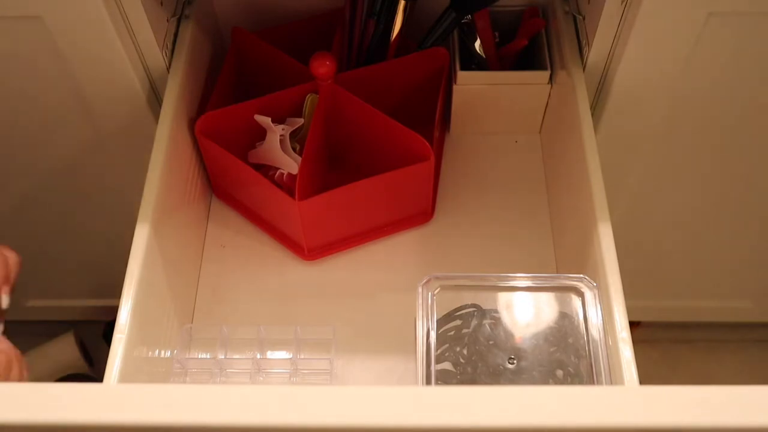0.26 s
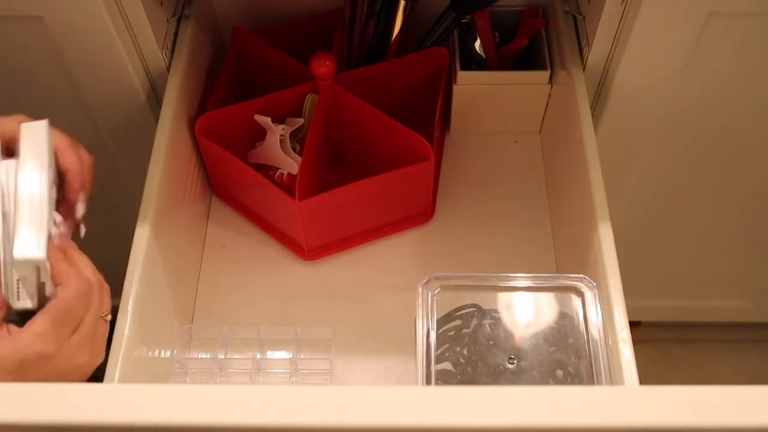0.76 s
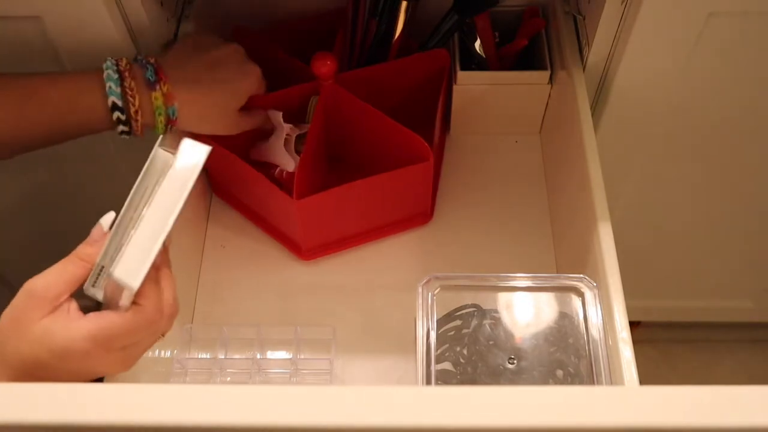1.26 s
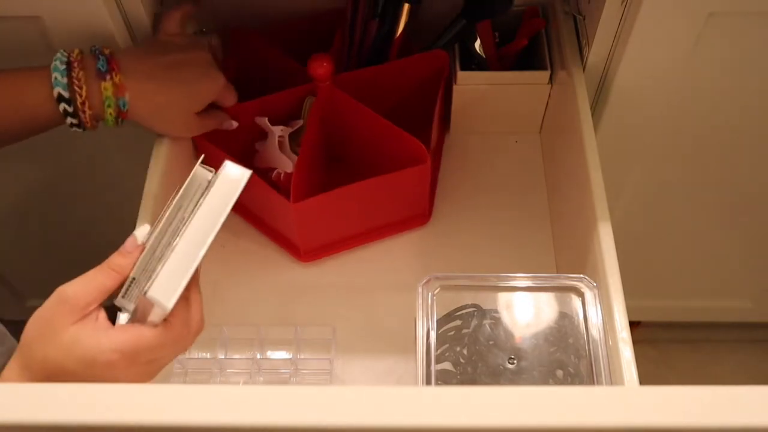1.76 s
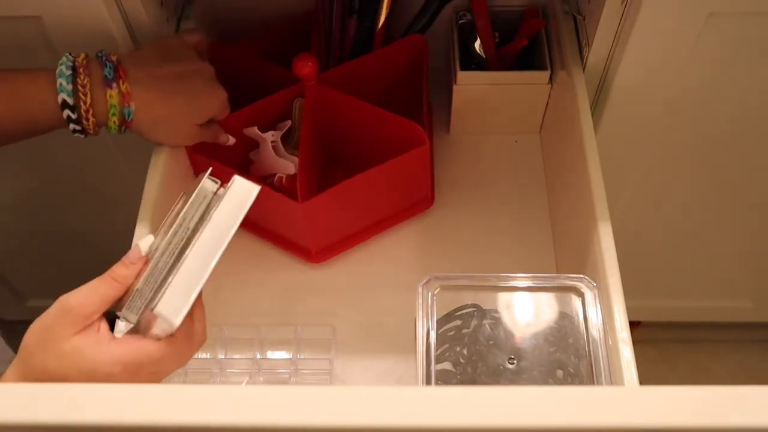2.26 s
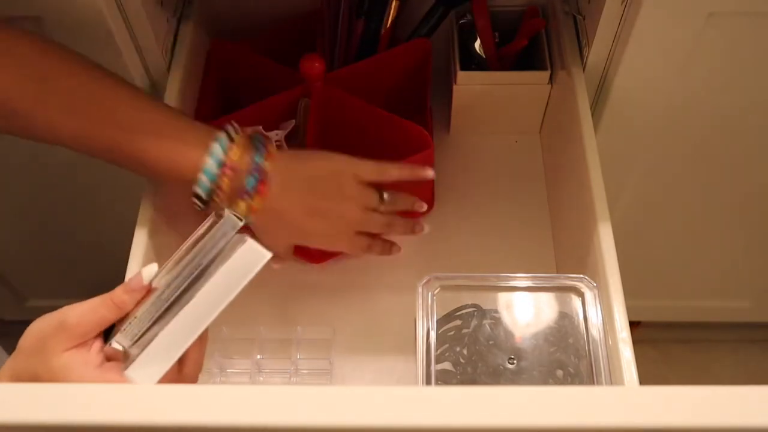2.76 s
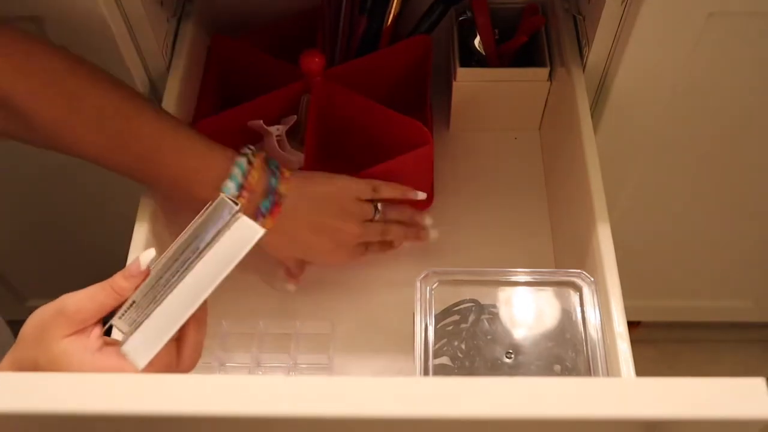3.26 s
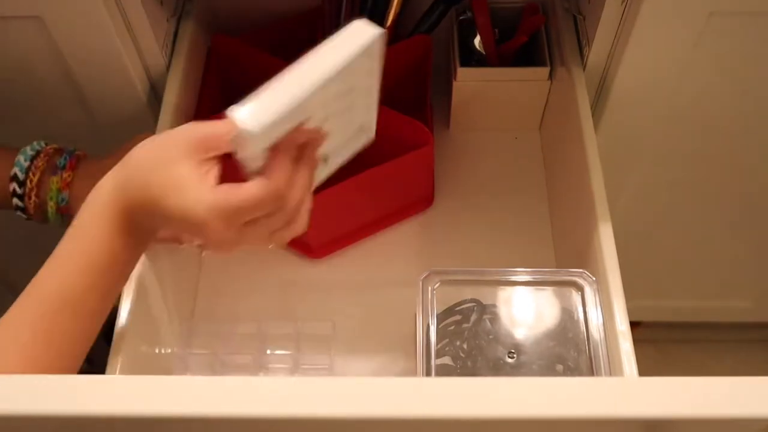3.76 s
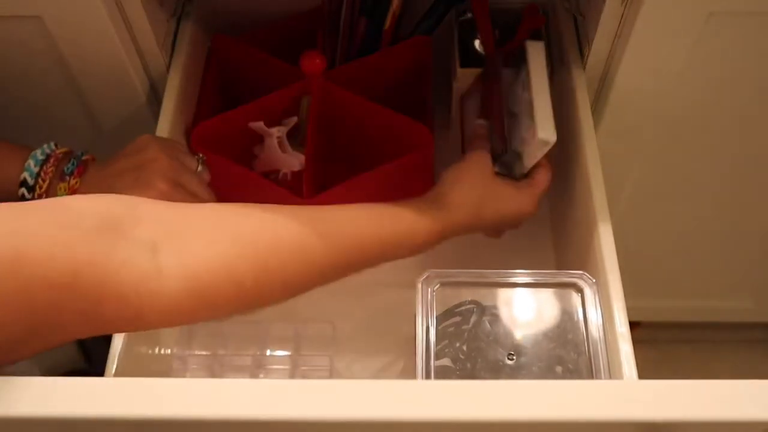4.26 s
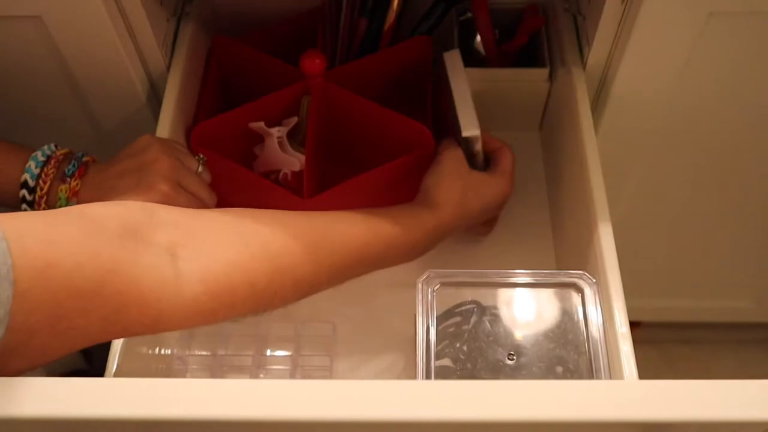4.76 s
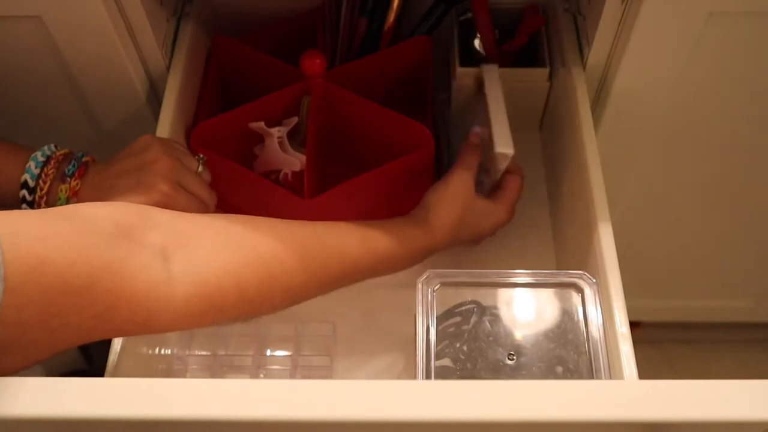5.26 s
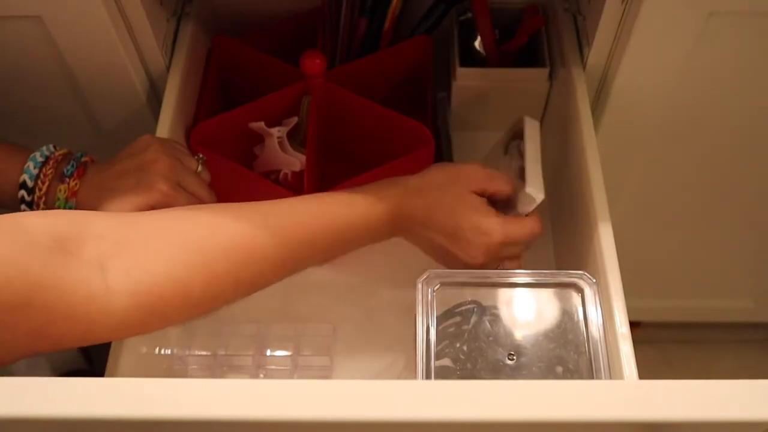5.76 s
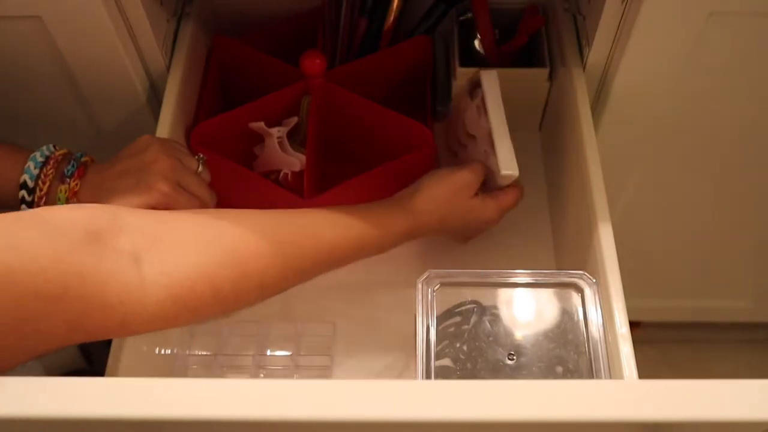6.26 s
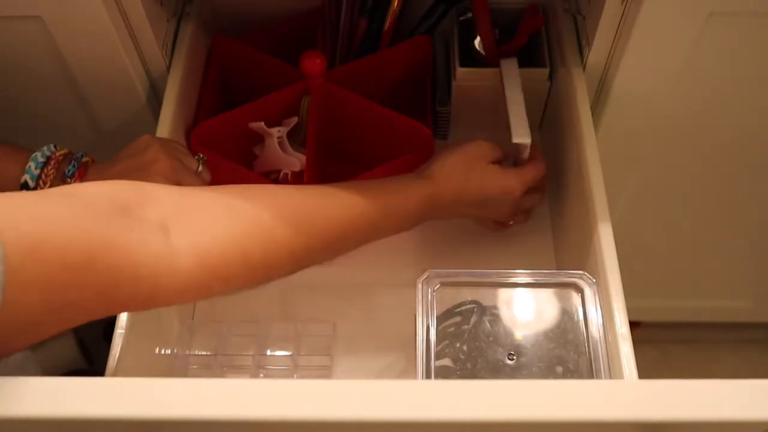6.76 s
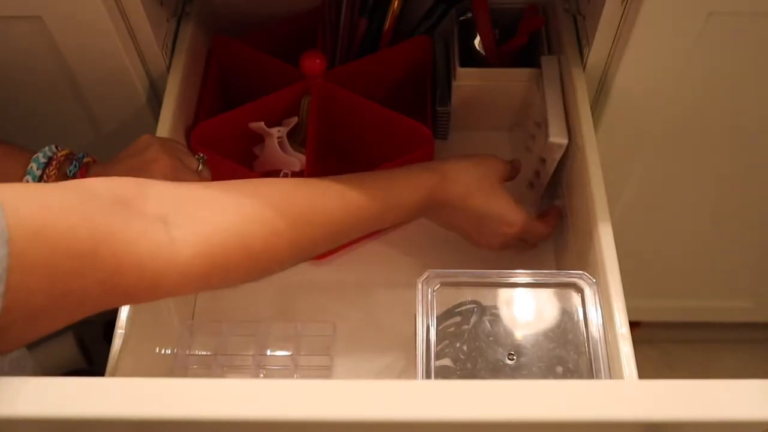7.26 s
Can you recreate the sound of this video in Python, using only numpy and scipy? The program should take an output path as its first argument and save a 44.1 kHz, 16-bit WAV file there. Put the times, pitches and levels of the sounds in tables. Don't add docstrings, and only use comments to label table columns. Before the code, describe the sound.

Close dry plastic clacks, short scuffs and woody bumps as small items are shifted in a drawer in a small room with faint ventilation noise.

```python
import sys
import numpy as np
from scipy import signal
from scipy.fft import rfft, irfft, next_fast_len
from scipy.io import wavfile
from scipy.ndimage import map_coordinates

SR = 44100
rng = np.random.default_rng(int(sys.argv[2]) if len(sys.argv) > 2 else 0)


def amplitude_ratio(level_db):
    exponent = np.asarray(level_db, float) / 20
    return 10 ** exponent


def master_out(mix):
    frames = np.transpose(np.atleast_2d(mix))
    ceiling = np.clip(frames, -1, 1)
    pcm = np.round(ceiling * 32767).astype(np.int16)
    wavfile.write(sys.argv[1], SR, pcm)


N = 330818
LEAD = 0.002


def unit(x):
    return x / np.sqrt(np.mean(x ** 2) + 1e-20)


def along(points, hz):
    f, value = np.transpose(points)
    return np.interp(np.log(hz + 1), np.log(f + 1), value)


def filtered(x, response):
    m = next_fast_len(len(x) + SR // 4)
    spectrum = rfft(x, m) * response(np.fft.rfftfreq(m, 1 / SR))
    return irfft(spectrum, m)[:len(x)]


def modes(table):
    def response(f):
        total = 0
        for k, (centre, width, db) in enumerate(table):
            damping = 1j * f * width
            total = total + (-1) ** k * amplitude_ratio(db) * damping / (centre * centre - f * f + damping)
        return total
    return response


def wobble(rate):
    knots = rng.standard_normal(int(N * rate / SR) + 4)
    return map_coordinates(knots, [np.arange(N) * rate / SR])


# (frequency [Hz], spectral level [dB per Hz])
AIR_SPECTRUM = [(12, -40), (20, -28), (44, -13), (156, -12.5), (314, -10), (393, -10), (620, -3.5),
                (863, 1.5), (1080, 2), (1600, -3.5), (2660, -8.5), (6710, -13.5), (11000, -19),
                (15500, -22.5)]


def hiss():
    noise = filtered(rng.standard_normal(N), lambda f: amplitude_ratio(along(AIR_SPECTRUM, f)))
    return amplitude_ratio(-41.5 + 0.16 * wobble(2.9)) * unit(noise)


# (frequency [Hz], width [Hz], level [dB])
BOARD_MODES = [(216, 37, -4.5), (273.4, 60, -2), (304.7, 29, 4.5), (364, 70, -9.5)]


def boards():
    return modes(BOARD_MODES)


# (frequency [Hz], width [Hz], level [dB])
PANEL_MODES = [(495, 45, -1), (582, 138, -4), (662, 99, -3), (755, 73, 4), (823, 140, 0.5),
               (951, 103, -2.5), (1200, 650, -17.5), (1760, 230, -15.5)]


def panels(*objects):
    return modes(PANEL_MODES + list(objects))


def strokes(table):
    rise, sag, fall = 315, 4.5, 164
    t = np.arange(0, N + 64, 64) / SR
    s, length, *levels_db = np.transpose(table)[..., None]
    before = np.maximum(s - t, 0)
    during = np.clip(t - s, 0, length)
    after = np.maximum(t - s - length, 0)
    shape_db = -rise * before - sag * during - fall * after
    gains = [np.linalg.norm(amplitude_ratio(db + shape_db), axis=0) for db in levels_db]
    return [np.interp(np.arange(N) / SR, t, gain) for gain in gains]


def grit(depth_db):
    grain_db = depth_db * wobble(70) + depth_db * wobble(400)
    return rng.standard_normal(N) * amplitude_ratio(grain_db)


# (frequency [Hz], spectral level [dB per Hz])
SCUFF_SPECTRUM = [(470, -44), (800, -34), (957, 10.5), (1040, 0), (1130, -1.5), (1580, -1.5), (2350, -4),
                  (3330, -5), (6910, -10), (14000, -29.5)]
# (time [s], length [s], board rumble level [dB], scuff level [dB])
SLIDES = [(0, 0.051, -48, -36), (0.097, 0.65, -46.5, -41.5), (1.115, 0.18, -35, -35.5),
          (1.44, 0.096, -34, -31), (1.603, 0.23, -41, -44), (1.927, .11, -25.5, -28), (2.1, .09, -36, -40),
          (2.336, 0.12, -34, -43), (2.838, 0.089, -26, -30.5), (3.17, 0.092, -44, -43),
          (3.577, .19, -40, -37.5), (3.84, 0.88, -48, -46), (4.91, 0.4, -46, -45), (5.29, 0.077, -47, -45),
          (5.738, .06, -35.5, -44), (5.812, 0.22, -32, -39), (6.068, .2, -45.5, -42),
          (6.47, 0.052, -41, -44), (6.604, 0.11, -45, -40), (6.75, 0.051, -34.5, -32.5),
          (6.874, 0.098, -32.5, -32), (7.106, .04, -45, -40.5), (7.3, 0.18, -45, -55)]


def sliding():
    board, panel = boards(), panels()
    rumble = unit(filtered(grit(0.56), lambda f: amplitude_ratio(-3.5) * board(f) + panel(f)))
    scuff = unit(filtered(grit(1.6), lambda f: amplitude_ratio(along(SCUFF_SPECTRUM, f))))
    on_wood, on_plastic = strokes(SLIDES)
    return amplitude_ratio(-8.5) * on_wood * rumble + amplitude_ratio(-4.5) * on_plastic * scuff


def contact(t60, rise, blow=0):
    t = np.clip(np.arange(SR // 4) / SR - LEAD, 0, None)
    decay = amplitude_ratio(-60 * (t / max(t60, 0.002)) ** 1.89)
    onset = (1 - np.exp(-t / rise)) ** 2
    push = t / 0.0002 * np.exp(-t / 0.00017)
    return rng.standard_normal(len(t)) * decay * onset + blow * push


def silence():
    return np.zeros(N + SR)


def add(track, s, sound, db):
    at = round((s - LEAD) * SR)
    track[at:at + len(sound)] += amplitude_ratio(db) * sound / np.abs(sound).max()


# (frequency [Hz], spectral level [dB per Hz])
CRACK_SPECTRUM = [(590, -26), (1000, -4.5), (1870, -7), (2180, 2), (2940, -7), (3190, -4), (3500, -3),
                  (5380, -5), (7700, -9), (16000, -42)]


def plastic(ring_hz, ring_db, hard_db):
    plate = modes([(ring_hz, 0.1 * ring_hz, ring_db)])
    return lambda f: plate(f) + amplitude_ratio(along(CRACK_SPECTRUM, f) + hard_db * np.log2((f + 500) / 4000))


def tap(track, s, db, ring_hz, ring_db, hard_db, t60):
    force = contact(t60, rise=0.00039)
    add(track, s, filtered(force, plastic(ring_hz, ring_db, hard_db)), db - 0.5)


# (time [s], peak level [dB],
# hardness [dB per octave], chatter t60 [s])
DRY_CLACKS = [(0.0171, -25, -5.5, 0.021), (0.1901, -32, -5, 0.019), (.375, -16, 2.5, 0.01),
              (0.6294, -28, 4, .025), (0.6687, -29, 3, .016), (0.6924, -27, 2, 0.013),
              (0.729, -24, -1.5, 0.018), (1.099, -23, -1, .028), (1.193, -15.5, 0, .019),
              (1.283, -24, -1, 0.044), (1.3083, -26, -6, .022), (1.402, -38, 9, .025),
              (1.426, -5, 3.5, 0.021), (1.5193, -11, 0.3, 0.027), (1.923, -16.5, -17, .032),
              (1.955, -20, -1, .022), (1.9865, -7, -0.3, 0.034), (2.0296, -24, -3, 0.016),
              (2.1499, -22, -2.5, 0.019), (2.4093, -20, -0.5, 0.021), (2.4497, -33, 6, .022),
              (2.4665, -25, -4, 0.035), (2.8164, -25.5, 2.1, 0.029), (2.847, -15, 4, 0.041),
              (3.613, -23, 9, .022), (3.637, -17.5, 4, 0.01), (3.6544, -25, -10, 0.015),
                  (3.684, -30, 9, 0.024), (3.7, -14, 4.5, 0.0063), (3.7268, -15, 1, 0.0078),
                  (3.992, -26.5, 1.5, 0.027), (4.068, -34, 12, 0.011), (4.3734, -25.5, -4.5, 0.039),
                  (4.7643, -28.5, -5, 0.028), (5.0248, -16.5, -0.5, .013), (5.0496, -27, -6, .024),
                  (5.264, -30.5, 4, 0.018), (5.34, -26, 5, .015), (5.345, -23.5, 9, .012),
                  (5.488, -30, -1, .022), (5.829, -23, 1.5, 0.031), (5.8328, -18.5, -1, .01),
                  (5.9459, -22, 1.5, 0.021), (6.4826, -23.5, -1, 0.017), (6.521, -20, 5, 0.02),
                  (6.7454, -29, -6, 0.017), (6.839, -8.5, 10, 0.011), (6.986, -32, 12, .012)]


def clacks():
    track = silence()
    for s, db, hard_db, t60 in DRY_CLACKS:
        tap(track, s, db, 2430, -20.5, hard_db, t60)
    return track[:N]


# (time [s], peak level [dB], ring [Hz], hardness [dB per octave])
LID_TAPS = [(0.25, -27, 2350, 4), (0.5886, -34, 4180, .6), (1.07, -6, 3960, 4), (1.139, -25, 4390, 9),
            (1.226, -18.5, 4440, 4), (1.2395, -22, 4380, 6), (1.5013, -18, 2620, 4),
            (1.6414, -17.5, 4500, -2.5), (1.727, -20.5, 4220, -4), (1.904, -17.5, 2710, -1.1),
            (2.139, -23, 2270, -10), (2.368, -25.5, 2400, 7), (3.558, -31, 1940, 1),
            (3.576, -22.5, 5000, 5), (3.746, -24, 6850, 15), (5.0002, -23, 2450, 4), (5.2984, -28, 2000, 3),
            (5.7246, -28, 2330, 0), (5.8444, -19.5, 2120, 7), (5.9125, -32, 4400, 9.9),
            (6.08, -17, 3480, 2.5), (7.1498, -23.5, 5940, 16.5)]


def pings():
    track = silence()
    for s, db, ring_hz, hard_db in LID_TAPS:
        tap(track, s, db, ring_hz, 3.5, hard_db, t60=0.022)
    return track[:N]


# (frequency [Hz], width [Hz], level [dB])
BOTTOM_MODES = [(102, 120, -10), (123.5, 15, 0.5), (156, 29, -13)]


def bottom():
    return modes(BOTTOM_MODES)


def knock(track, s, db, force, note_hz, boards_db, bottom_db):
    add(track, s, filtered(force, panels((note_hz, 140, 4))), db)
    add(track, s, filtered(force, boards()), db + boards_db)
    add(track, s, filtered(force, bottom()), db + bottom_db)


def blows(table, bottom_db):
    track = silence()
    for s, db, note_hz, boards_db, t60 in table:
        force = contact(t60, rise=0.001, blow=2.6)
        knock(track, s, db - 4.5, force, note_hz, boards_db + 2.5, boards_db + bottom_db)
    return track[:N]


# (time [s], peak level [dB], note [Hz], weight on the boards [dB], contact t60 [s])
CASE_SETDOWNS = [(.733, -25, 950, -33, 0.049), (3.58, -34, 877, -20, 0.032),
                 (3.704, -24.5, 1160, -4.5, .017), (3.7265, -15, 1260, -15, .012),
                 (3.752, -24, 1320, -1.7, 0.021), (3.878, -39, 972, 2, 0.014), (4.374, -16, 763, -33, .035),
                 (4.395, -20.5, 630, -21, 0.035), (4.764, -29.5, 666, -14, 0.068),
                 (5.002, -12.5, 956, -10, 0.042), (5.025, -19.5, 520, -12, 0.046),
                 (5.059, -31, 646, -5, 0.039), (5.299, -28.5, 780, -27, 0.035),
                 (5.336, -27, 930, -15.5, 0.029), (5.758, -38, 1050, 0, .03),
                 (5.828, -17.5, 845, -14, 0.017), (5.87, -35, 886, -15, .027),
                 (5.946, -24.5, 770, -23, .019), (6.522, -28.5, 740, -14, 0.027),
                 (6.743, -27, 950, -20, 0.047), (6.791, -25, 930, -23, .053),
                 (6.841, -11.5, 980, -24, 0.024), (7.083, -31, 940, -23, 0.032)]


def setdowns():
    return blows(CASE_SETDOWNS, -22)


# (time [s], peak level [dB], note [Hz], weight on the boards [dB], contact t60 [s])
ORGANISER_BUMPS = [(1.071, -15.5, 1200, -38, 0.028), (1.142, -19.5, 690, -32, 0.073),
                   (1.189, -25.5, 840, -15, 0.084), (1.284, -23, 790, -24, 0.036),
                   (1.404, -26.5, 507, -7.5, 0.096), (1.427, -12, 1140, -27, 0.05),
                   (1.525, -14, 800, -30, .042), (1.905, -11, 456, -3, 0.033), (1.953, -14, 507, -3, 0.08),
                   (1.99, -7.5, 530, -12, 0.056), (2.085, -31, 500, -3, 0.063),
                   (2.149, -23, 490, -18, 0.064), (2.324, -23.5, 940, -8, 0.032),
                   (2.36, -25, 626, -8.5, 0.075), (2.825, -14.5, 630, -7, 0.06),
                   (2.92, -21.5, 464, -5.5, .035), (3.034, -40.5, 867, 5, 0.036),
                   (3.231, -18.5, 474, -13, 0.041), (3.29, -30.5, 497, -12, .03)]


def bumps():
    return blows(ORGANISER_BUMPS, -17.5)


# (time [s], peak level [dB], ring [Hz], ring level [dB], chatter t60 [s])
SLAP_MODES = [
    (1.0715, -14.5, 2270, 8, 0.017),
    (5.033, -33, 3050, -1, .07),
    (6.8423, -2, 2420, -4, .011),
    (6.8447, -6.5, 3460, 9, .022),
    (6.8446, -13, 4690, -8, 0.037),
    (6.873, -31, 3430, 9, .05),
]


def slap():
    track = silence()
    for s, db, ring_hz, ring_db, t60 in SLAP_MODES:
        tap(track, s, db, ring_hz, ring_db, -1.6, t60)
    return track[:N]


# (time [s], length [s], level [dB])
LID_RUBS = [
    (1.21, .05, -42),
    (3.578, 0.041, -39),
    (3.68, 0.079, -41),
    (5.3, .06, -50),
    (6.75, 0.047, -37),
    (6.87, 0.083, -45.5),
]


def rubs():
    lid = modes([(5800, 3800, 0)])
    on_lids, = strokes(LID_RUBS)
    return on_lids * unit(filtered(grit(3.0), lambda f: lid(f) ** 2))


# (time [s], peak level [dB], contact t60 [s])
BOTTOM_PUSHES = [(1.404, -38, .08), (1.429, -41, .04), (1.519, -45, 0.056), (2.05, -48, .08),
                 (2.831, -31, .06), (3.02, -45, 0.036), (3.23, -45, 0.056), (3.705, -41, 0.033),
                 (3.751, -39, 0.062), (3.869, -52, 0.027), (4.376, -53, 0.023)]


def thuds():
    track = silence()
    for s, db, t60 in BOTTOM_PUSHES:
        add(track, s, filtered(contact(t60, rise=0.0037), bottom()), db)
    return track[:N]


# (time [s], rattle level [dB], knock level [dB], rise [s], t60 [s])
SIDE_SHOVES = [
    (1.992, -9.5, -12.5, 0.0023, 0.061),
    (2.835, -9.5, -10, 0.0079, 0.088),
]


def shoves():
    rattle, blow = silence(), silence()
    for s, rattle_db, knock_db, rise, t60 in SIDE_SHOVES:
        add(rattle, s, filtered(contact(t60, rise), plastic(2100, -18, -0.1)), rattle_db)
        knock(blow, s, knock_db, contact(t60, rise), 723, -9.5, -36)
    return rattle[:N], blow[:N]


# (frequency [Hz], t60 [s])
ROOM_DECAY = [(150, 0.38), (600, 0.35), (2500, 0.31), (6000, 0.21), (12000, 0.093)]


def room(x):
    wet, step = np.zeros(N + SR), SR // 8
    for at in range(0, N, step):
        hz, t, z = signal.stft(rng.standard_normal(SR // 2), SR, nperseg=256)
        decay = amplitude_ratio(-60 * t / along(ROOM_DECAY, hz)[:, None])
        tail = signal.istft(z * decay, SR, nperseg=256)[1]
        tail = np.pad(tail / np.linalg.norm(tail), (SR // 300, 0))
        piece = signal.fftconvolve(x[at:at + step], tail)
        wet[at:at + len(piece)] += piece
    return wet[:N]


def microphone(x):
    bass = signal.butter(3, 90, "high", fs=SR, output="sos")
    top = signal.butter(2, 10500, fs=SR, output="sos")
    return signal.sosfilt(np.vstack([bass, top]), x)


def scene():
    rattle, shove = shoves()
    slide = sliding() + rubs()
    taps = clacks() + pings() + slap() + rattle
    knocks = setdowns() + bumps() + thuds() + shove
    tail = room(amplitude_ratio(-6.0) * taps + amplitude_ratio(-4.5) * knocks + amplitude_ratio(-12.5) * slide)
    return (microphone(taps + knocks + slide + tail) + hiss())[None]


def top_cut(x):
    return signal.sosfilt(signal.butter(12, 16990, fs=SR, output="sos"), x)


def record(dry):
    mix = filtered(dry[0], lambda f: f < 15800)[None]
    return top_cut(mix)


dry = scene()
out = record(dry)
master_out(out)
```